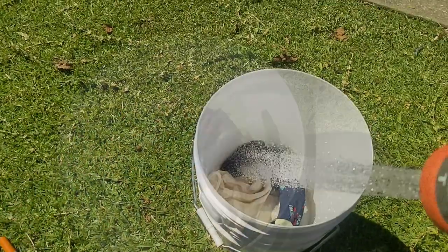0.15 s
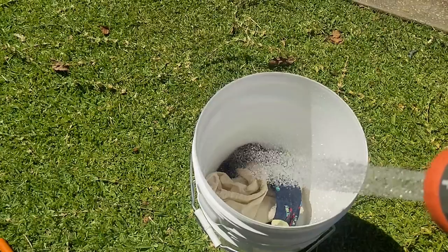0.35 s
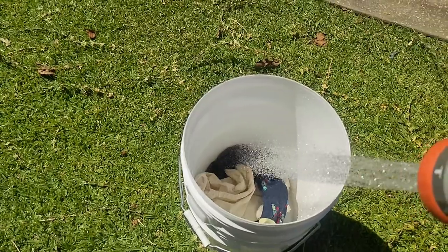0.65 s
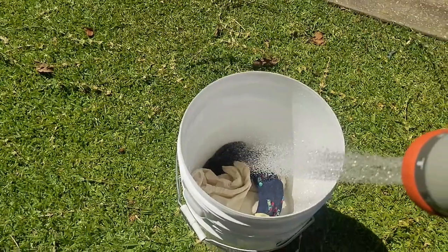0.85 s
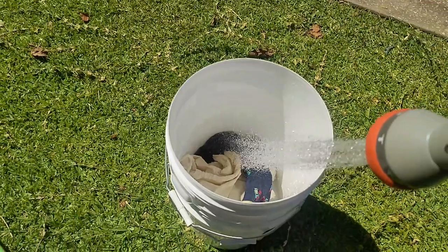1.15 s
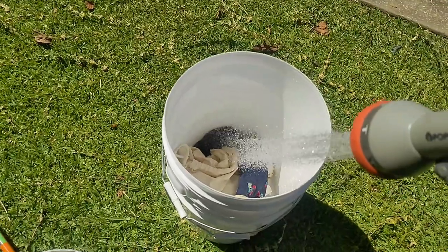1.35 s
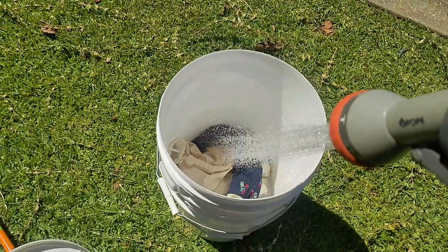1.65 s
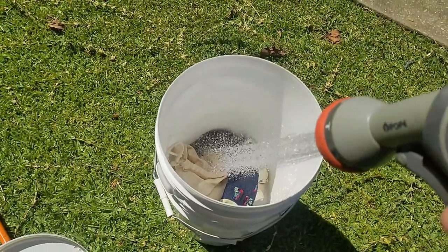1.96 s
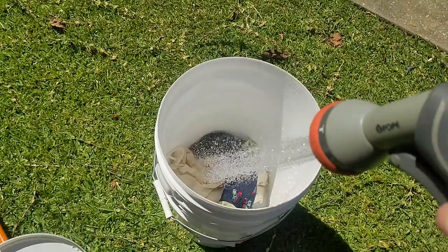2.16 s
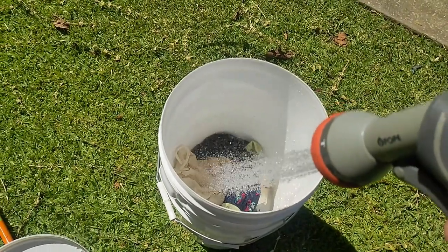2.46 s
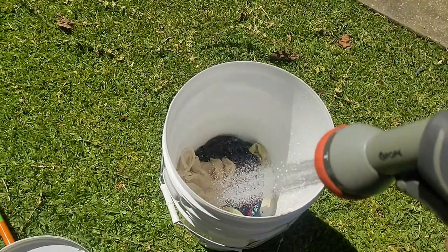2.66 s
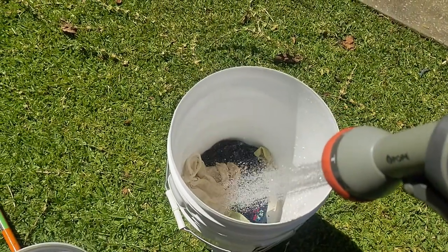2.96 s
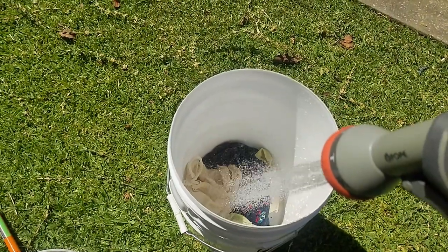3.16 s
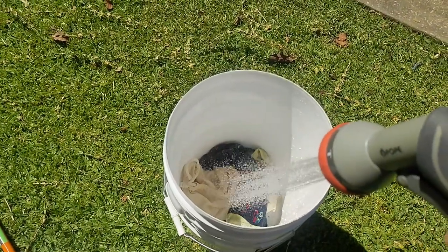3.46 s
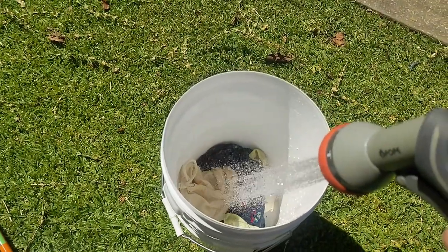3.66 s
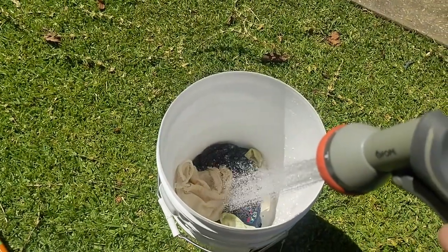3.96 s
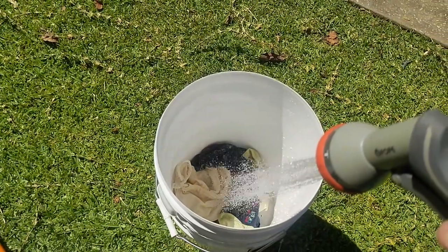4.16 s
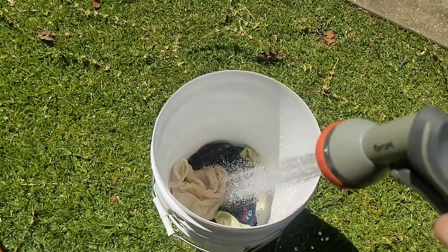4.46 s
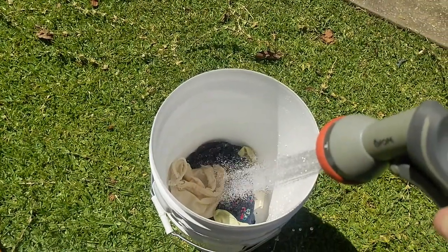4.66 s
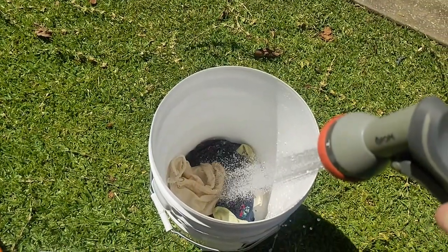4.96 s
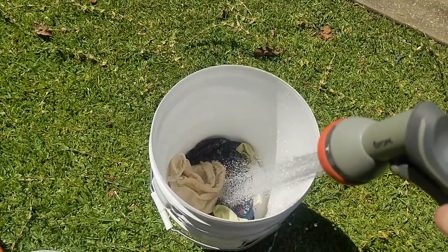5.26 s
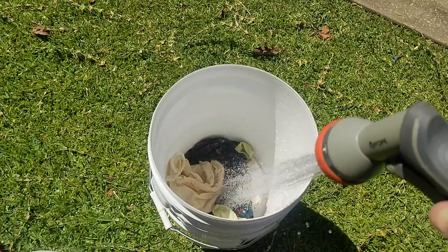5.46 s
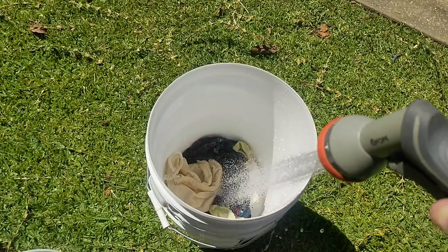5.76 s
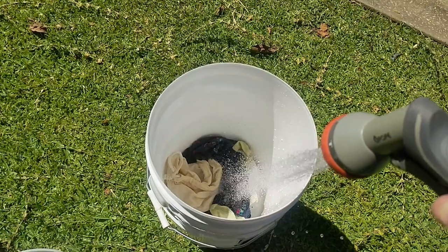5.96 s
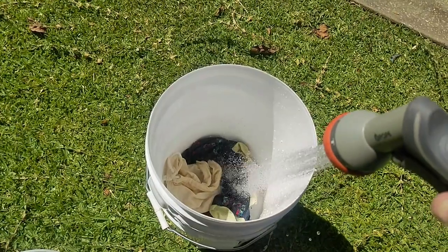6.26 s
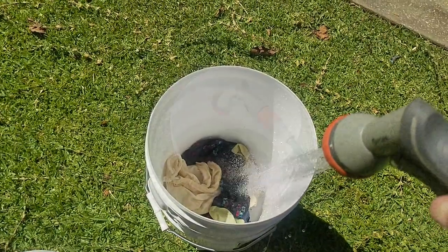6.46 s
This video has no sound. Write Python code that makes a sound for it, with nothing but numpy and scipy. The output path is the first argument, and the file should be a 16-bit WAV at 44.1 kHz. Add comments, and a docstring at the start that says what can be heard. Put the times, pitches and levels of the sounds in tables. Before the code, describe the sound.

Outdoors, close to the microphones and slightly right, a hose jet is already spraying into a plastic bucket holding wet laundry. From 0 to 0.6 s it is thin and grainy, with separate bright ticks on plastic and low wind buffets. It strengthens from 0.7 s to a dense, high, sizzling hiss around 1.3 to 1.9 s, with crackles, sharp wall ticks, dull slaps on cloth and a quick gurgle near 1.6 s. It thins noticeably around 2.3 s, then builds again by 3 s, with hollow rings that wobble and glide between 2.8 and 4 s and small gurgles near 3, 3.9 and 5 s. From 4 s the spray is full and steady, splashing into a gathering pool with more bubbles and muffled drumming beneath. A patter flurry comes near 6.2 s. Faint breeze and yard air persist; the water is still running at 6.6 s.

```python
"""Hose spray into a bucket of laundry

A garden hose nozzle sprays into a plastic bucket of laundry on a lawn, just right of the microphones.
Thousands of random clicks stand for drops: filters make them hiss on plastic, splash on wet cloth
and drum on the air in the bucket. Short tones make slaps, bubbles and patters; drifting tones make hollows ring.
The jet swings from the wall over the cloth into the gathering pool, which changes the colour.
Slow-changing low noise is the light breeze on the microphones, over a quiet, steady yard background.
"""
import sys
import numpy as np
from scipy import signal
from scipy.fft import rfft, irfft
from scipy.io import wavfile
from scipy.ndimage import uniform_filter1d, map_coordinates

SR = 44100
rng = np.random.default_rng(int(sys.argv[2]) if len(sys.argv) > 2 else 0)


def persist_wave(psi):
    """Save psi, clipped to +-1, as 16-bit WAV."""
    counts = np.round(np.clip(psi, -1, 1) * 32767).astype(np.int16)
    wavfile.write(sys.argv[1], SR, np.atleast_2d(counts).T)


N = 291942
TAPS = 2048  # length of filters and of short sounds, in samples
TIME = np.arange(N) / SR
FREQS = np.maximum(np.arange(TAPS // 2 + 1), .5) * SR / TAPS  # the lowest is kept above zero for logarithms

# how loud the jet is where it lands, before gains and flutter: (t/s, hiss level/dB, splash level/dB, drum level/dB)
JET_LEVELS = [(0.0, -28, -42.5, -44.5), (0.25, -30.5, -46, -43.5), (0.47, -28, -41, -40.5),
              (0.64, -27.7, -38.5, -37), (0.73, -23.3, -36.8, -36), (0.95, -22.5, -33.5, -34),
              (1.25, -19.5, -31.5, -35.4), (1.53, -20.5, -31.5, -36), (1.86, -21, -34, -35),
              (2.1, -24.5, -36, -39), (2.3, -28.2, -37.5, -40), (2.6, -24.5, -34, -37.5),
              (2.9, -23.5, -32.5, -38), (3.55, -22, -33, -36), (3.95, -22, -32, -36.5),
              (4.25, -21, -31.5, -37.5), (4.85, -20.5, -32.5, -36.5), (5.85, -20, -31.5, -38.5),
              (6.05, -20, -32, -39), (6.35, -19.5, -30, -35), (6.62, -21.0, -32, -34)]
# where the hand points the jet, before trembling:
# (t/s, place: 0 far wall, 1 foot of the wall, 2 cloth, 3 pool, 4 and above near wall)
JET_AIM = [(0, 1.5), (1.05, 0), (1.35, 1.34), (1.65, 1), (2.0, 1.8), (2.45, 1.14), (3.6, 2), (4.3, 2.5),
           (5.1, 3.5), (5.95, 2.5), (6.4, 9)]
# how the jet breaks up on each place, one row per place:
# (spread of drop sizes/dB, extra coarse hiss level/dB, crackle level/dB before its gain)
JET_BREAKUP = [(3.5, 3.5, -1), (3, 1, -1.5), (2.5, 0.6, -4.5), (3.0, -1.3, -12.5), (3, 0.8, -11.5)]
# brief surges of the spray, full in the hiss and about half as many dB in splash and drum: (t/s, rise level/dB)
JET_SURGES = [(.44, 2.5), (4.8, 2)]
SURGE_S = 0.1  # length of a surge
HISS_DB, SPLASH_DB, DRUM_DB = 0.59, 1.84, -0.54  # gain of each layer
# below full hiss the spray thins to lone drops: dB more spread per dB of level
THIN_SPRAY, FULL_HISS_DB = 0.082, -18.5

# spray on plastic: (f/Hz, coarse drops level/dB, fine drops level/dB)
PLASTIC_HISS = [(2510, -42.5, -47), (5460, -24, -43.5), (5780, -12.5, -37), (5870, -13, -37),
                (6260, -8.5, -16), (7000, -5.5, -11.5), (7720, -5, -4), (7970, -9, -1), (8956, -17, -0.5),
                (8720, -6.5, -2.5), (9360, -27, -9), (9440, -36.5, -20.5), (10700, -38, -18.5)]
# a thin high ring of sparser drops: (f/Hz, level/dB)
THIN_RING = [(6500, -35.5), (7900, -13), (8300, -6.5), (8520, 0), (8750, -10), (9100, -18), (9700, -29)]
# higher resonances, rung by the splashing: (f/Hz, width f/Hz, relative level/dB on each of the five places)
SPLASH_RESONANCES = [(1463, 87, -8, -17, -4, -8.5, -12), (1588, 100, -8, -8, -0.5, -8.3, -7),
                     (1727, 150, -8, -3, 0, -3.5, -1), (1952, 204, -9, -3, -4, 0, -4.5),
                     (2160, 200, -12.5, -7.5, -5.5, -11, -2), (2520, 290, -9, -7, -5.5, -12, -5),
                     (2816, 300, -5, -9, -5.5, -6.5, -4), (3370, 320, 1.5, 1, 0, -0.5, 3),
                     (3625, 510, -6, -1.5, 0, -1.5, 3), (3920, 550, -2, -3.5, -14, -4.5, 0),
                     (4660, 1140, -15, -12, -10.5, -7.5, -10)]
# air resonances of the bucket: (f/Hz, width f/Hz, relative level/dB on each of the five places)
AIR_RESONANCES = [(284.3, 63, -9, -5.5, -3.5, -7.5, -3.5), (397.6, 86, -8.5, 1, -5, -5.5, -2),
                  (494, 97, -7.5, -5, -16.5, -11, -13), (615, 243, -12, -3.5, -4, -3.5, -1),
                  (753, 81, 0, 0, -12, -13, -4.5), (831, 70, -15, 0.5, -2, -2, -0.5),
                  (924, 51, -1, -1, -5.5, -7.5, -2), (1048, 106, -4, -4, -1.5, -8, -2),
                  (1149, 70, -4.5, -22.5, -6, -4.5, -5.5), (1289, 130, -8.5, -10, -3, -12, -5.5)]
WAVER_SHARE = .006  # the sloshing water shifts the resonances

# a coarse drop cracking on bare plastic, also the colour of slap spatter: (f/Hz, level/dB)
CRACK_COLOUR = [(700, -21.5), (1500, -2.5), (2000, -1), (2600, -4), (3400, -6), (4100, -4.5), (5200, -11),
                (7000, -24), (9500, -31)]
CRACKLE_DB, CRACKLE_FOLLOWS = -17.5, 0.63  # gain; share of the splash level that it follows

# gusts on the microphones, each a swell before flicker: (t/s, length t/s, left level/dB, right level/dB)
WIND_GUSTS = [(0, 0.15, -41, -46), (0.22, 0.19, -51, -48), (0.51, 0.18, -42, -37),
              (0.727, 0.07, -58, -40.5), (0.867, 0.12, -51, -39.5), (1.13, 0.18, -62, -43),
              (1.68, 0.27, -49, -55), (1.98, .3, -56, -59), (2.184, 0.16, -49, -62),
              (3.05, .07, -49.5, -55), (3.34, .08, -57, -51), (4.078, 0.082, -51, -59),
              (4.28, 0.12, -50, -66), (4.436, 0.27, -60, -43), (4.757, 0.11, -58, -41),
              (5.36, .12, -51, -67), (5.664, 0.13, -42, -71), (5.86, 0.21, -55, -51),
              (6.023, .16, -50, -58), (6.177, 0.11, -59, -40.5), (6.294, .08, -58, -41)]
# wind rumble: (f/Hz, level/dB)
WIND_RUMBLE = [(12, -23.5), (32, 2), (50, 0.5), (78, 3), (110, -4.5), (170, -15.5), (300, -31), (1000, -60)]
BREEZE_DB = -61  # the light air between gusts, before it wanders
# steady outdoor background: (f/Hz, level/dB before its gain)
YARD_COLOUR = [(30, 3), (75, -5.5), (150, 4), (250, -17), (600, -8.5), (3000, -15.5), (9000, -28)]
YARD_DB = -57.5

# hollows in the laundry that ring as the jet passes, before slosh and patchiness:
# (t/s, length t/s, f/Hz, glide in Hz per s, level/dB)
HOLLOWS = [(0.05, .25, 755, 0, -48.5), (.55, .3, 760, -1.5, -49), (0.93, 0.4, 792, 60, -43.5),
           (1.4, .7, 830, 60, -46), (1.6, .8, 409.5, -40, -49), (2.57, .16, 970, 1, -44.5),
           (2.84, 0.24, 1010, 346, -40.5), (2.92, 0.48, 1597, 281.5, -41), (3.22, .14, 1550, -300, -44),
           (3.27, .26, 1000, 250, -44), (3.299, .75, 1295, 30, -45.5), (3.53, 0.56, 825, 20, -42),
           (3.66, .2, 1740, 700, -48), (4.05, 0.45, 1620, 0, -45), (4.85, 1.2, 836, -10.5, -46.5)]
POCKET_WIDTH = 0.05  # bandwidth as a share of the pitch
POCKET_SLOSH_SHARE, POCKET_PATCHY_DB = .016, 1.6  # spread of each hollow's pitch and of its level

# big drops that tick on the wall: (first touch t/s, level/dB before the shared gain)
WALL_TICKS = [(.0139, -19), (0.1827, -16), (0.199, -14.5), (0.2364, -15.5), (0.2853, -14), (0.4364, -13.5),
              (.6586, -16.5), (0.6913, -11), (0.7223, -12), (0.7402, -16), (0.9113, -14), (0.9732, -10),
              (0.9852, -5.5), (1.0666, -12), (1.1414, -12), (1.1634, -9.5), (1.3453, -9), (1.5584, -10.5),
              (1.5718, -9), (1.8377, -12), (1.8696, -12.5), (1.8966, -9.5), (2.0986, -9), (2.5621, -13.5),
              (2.9931, -12), (3.1667, -13), (3.2036, -12), (4.1265, -14), (4.4139, -13), (4.774, -10.5),
              (6.5845, -13)]
# a heavy drop on plastic: (f/Hz, level/dB)
HEAVY_DROP_RING = [(3000, -42), (5400, -27), (6400, -14), (7200, 1.5), (8400, 4.5), (9000, -6.5),
                   (9700, -33.5)]
TICK_DB, TICK_RISE_S = 15.2, .0011  # shared gain; delay from first touch to burst
# big drops that slap wet cloth: (t/s, level/dB before the shared gain, f/Hz, ring time t/s)
CLOTH_SLAPS = [(.6031, -20.5, 1550, 0.00034), (.864, -23, 3360, 0.00033), (.9454, -17.5, 3320, 0.0003),
               (1.0962, -24, 3970, .0003), (1.1424, -9, 2530, 0.00018), (1.202, -21, 3560, 0.0006),
               (1.2437, -9, 3370, 0.00021), (1.3068, -19, 3420, .0003), (1.3392, -19, 3490, .0003),
               (1.556, -21, 3600, .0003), (1.679, -22.5, 1800, .0008), (1.6816, -11.5, 3800, 0.00022),
               (1.7298, -23, 3470, .0003), (1.747, -13, 3550, 0.00035), (1.819, -19, 3920, .0003),
               (1.8746, -14.5, 3800, 0.00029)]
SLAP_DB = 11  # shared gain of the slaps
SPATTER_DB, SPATTER_S = -16, 0.003  # droplets thrown off by a slap: level against the slap, fall time
# flurries of drops on one patch of wet wall: (t/s, length t/s, middle f/Hz, level/dB)
WALL_PATTERS = [(0.879, .12, 3400, -39), (1.05, .14, 3700, -38), (1.2, .2, 3150, -35),
                (1.37, .26, 3720, -34.5), (1.2, 0.22, 6830, -27.5), (1.79, 0.19, 3700, -35),
                (6.19, .24, 4100, -38.5)]
# gurgles in folds of the cloth, each a quick run of bubbles:
# (t/s, average gap between bubbles t/s, middle f/Hz, starting level/dB)
FOLD_GURGLES = [(1.586, .0065, 1840, -18), (3.021, .007, 1630, -28), (3.941, .011, 1614, -19),
                (5.035, .01, 1910, -20)]
GURGLE_RING_S, GURGLE_FADE_DB_PER_S = 0.0035, 42  # ring time of a bubble; how the run fades

# the left microphone faces away from the bucket: (f/Hz, level/dB against the right one)
LEFT_SHADOW = [(250, -2), (450, -5), (700, -8.5), (850, -7), (1050, -4.5), (1400, -2.5), (1950, -5.5),
               (2400, 0), (3000, -4), (3450, -8.5), (4500, -0.5), (5300, -2), (6400, -11), (7400, -11),
               (8700, -17)]
LEFT_LAG_S = 0.00023  # short sounds reach the left this much later
TOP_HZ = 9650  # where the recorder cuts the top


def undb(db):
    """Decibels to gain."""
    return np.exp(np.asarray(db) * (np.log(10) / 20))


def curves(table):
    """Each column of a table of (s, values..) at every sample."""
    s, *columns = np.transpose(table)
    return [np.interp(TIME, s, column) for column in columns]


def unit(x):
    """Scale so that the last (right) channel has an rms, or average strength, of 1."""
    return x / np.sqrt(np.mean(x[-1] ** 2))


def walk(rate, time=TIME):
    """Wander by chance: straight lines between random values, rate of them a second; spread near 1."""
    steps = rng.standard_normal(N // 64)
    return 1.167 * np.interp(time * rate, np.arange(len(steps)), steps)


def swell(s, length_s, time=TIME):
    """A smooth rise and fall around a moment, peak 1."""
    out = np.zeros(len(time))
    near = abs(time - s) < 2 * length_s
    out[near] = np.exp(-(2 * (time[near] - s) / length_s) ** 2)
    return out


def shape(points):
    """Gain at each frequency from (Hz, dB) points."""
    hz, db = np.transpose(points)
    return undb(np.interp(np.log(FREQS), np.log(hz), db))


def colour(x, gain):
    """Filter with the given gain at each frequency, without sounding ahead of its input."""
    cepstrum = irfft(np.log(gain + 1e-6))
    # folding the second half onto the first puts the response as early as possible
    cepstrum[1:TAPS // 2] *= 2
    cepstrum[TAPS // 2 + 1:] = 0
    response = irfft(np.exp(rfft(cepstrum)))
    return signal.oaconvolve(x, response[None])[:, :N]


def resonance(hz, width):
    """Gain of steep resonances at each frequency, one column each."""
    f = FREQS[:, None]
    detuning = (f ** 2 - hz ** 2) / (f * width)
    return 1 / (1 + (np.sqrt(2) - 1) * detuning ** 2)


def impulses(s, size):
    """Clicks at the given times, each shared between two samples."""
    at = np.clip(s * SR, 0, N)
    i = at.astype(int)
    first = np.bincount(i, size * (1 + i - at), N + 2)
    second = np.bincount(i + 1, size * (at - i), N + 2)
    return (first + second)[:N]


def shower(spread_db, echo, lag_s, lag_spread_s, count):
    """Drops of very unequal size; each lands elsewhere, so it has its own lag to the left and its own wall echo."""
    s, rank, path, sign = rng.random((count, 4)).T
    s = s * N / SR
    weight = np.minimum(-np.log(1 - rank), 6.5)  # drops above a certain size break up
    size = np.sign(sign - .5) * undb(np.interp(s, TIME, spread_db) * weight)
    lag = lag_s + lag_spread_s * rng.laplace(size=count)
    back = s + 0.000303 + .002 * path  # when the echo returns
    return np.array([impulses(s + d, size) + echo * impulses(back + d, size) for d in (lag, 0)])


def steady(x):
    """Hold the flow of a shower even over a third of a second, whatever its drop sizes."""
    return x / np.sqrt(uniform_filter1d(x[-1] ** 2, SR // 3))


def bucket(x, modes, aim):
    """Ring the resonances; how strongly each is driven depends on where the jet lands."""
    hz, width, *places = np.transpose(modes)
    power = resonance(hz, width) ** 2
    aim = np.clip(aim, 0, len(places) - 1)
    out = 0
    for place, db in enumerate(places):
        nearness = np.maximum(1 - abs(aim - place), 0)  # fade between neighbouring places
        out += nearness * unit(colour(x, np.sqrt(power @ undb(db) ** 2)))
    return out


def add(track, s, sound):
    """Mix a short sound into both channels; it reaches the left one later."""
    for channel, at in zip(track, (s + LEFT_LAG_S, s)):
        i = min(max(int(at * SR), 0), N)
        channel[i:i + len(sound)] += sound[:N - i]


def blip(hz, ring_s):
    """A tone that swells and dies within a few ring times."""
    t = TIME[:TAPS]
    return t / ring_s * np.exp(-t / ring_s) * np.sin(2 * np.pi * hz * t)


def bubbles(low_hz, high_hz, cycles, rise, size_db, count):
    """Trapped air rings briefly and rises in pitch; there is more of it as the pool gathers."""
    out, t = np.zeros((2, N)), TIME[:TAPS]
    for when, pitch, rank in rng.random((count, 3)):
        hz = low_hz * (high_hz / low_hz) ** pitch
        age = t * hz / cycles  # in fall times
        ring = np.sin(2 * np.pi * hz * t * (1 + rise * np.minimum(age, 4))) * np.exp(-age)
        size = undb(size_db * min(-np.log(1 - rank), 4))
        add(out, when ** .7 * N / SR, ring * size)  # the power crowds bubbles towards the end
    return unit(out)


def waver(x):
    """Let all pitches drift a little together, by reading the sound slightly faster or slower."""
    at = np.cumsum(1 + WAVER_SHARE * walk(5))
    return np.array([map_coordinates(channel, [at], order=2, mode="mirror") for channel in x])


def hissing(spread_db, coarse_db):
    """Spray ticks on the plastic in clumps as the jet breaks up; coarse drops sound lower, sparser ones ring thinly."""
    hz, *spectra = np.transpose(PLASTIC_HISS)
    hiss = 0
    for db, share in zip(spectra, (undb(coarse_db), 1)):
        drops = steady(shower(spread_db, echo=0.32, lag_s=.00016, lag_spread_s=.00005, count=50000))
        clumps = undb(1.58 * walk(450) + 0.2 * walk(70))
        hiss += share * colour(drops * clumps, shape(np.c_[hz, db]))
    sparse = steady(shower(spread_db, echo=0.36, lag_s=.00016, lag_spread_s=.00005, count=6000))
    thin_ring = unit(colour(sparse, shape(THIN_RING)))
    return unit(unit(hiss) + undb(-8.5) * thin_ring)


def splashing(aim, spread_db):
    """Drops burst on the wet cloth and in the pool and whip bubbles into it."""
    drops = steady(shower(spread_db - .7, echo=0.49, lag_s=.00014, lag_spread_s=.000045, count=45000))
    fizz = bubbles(low_hz=900, high_hz=4150, cycles=11, rise=0.023, size_db=3.5, count=900)
    return bucket(drops, SPLASH_RESONANCES, aim) * undb(0.66 * walk(60)) + undb(-15.5) * fizz


def drumming(aim):
    """The dense patter on the laundry drives the air in the bucket; large bubbles gurgle under it."""
    patter = shower(np.full(N, 2.0), echo=0.29, lag_s=.00008, lag_spread_s=.00007, count=30000)
    gurgle = bubbles(low_hz=451.0, high_hz=1260, cycles=11.8, rise=0.014, size_db=-3.0, count=600)
    return bucket(patter, AIR_RESONANCES, aim) * undb(0.49 * walk(17)) + undb(-20.5) * gurgle


def crackling():
    """Sparse coarse drops crack on the bare plastic."""
    drops = steady(shower(np.full(N, 2.5), echo=0.32, lag_s=0.00012, lag_spread_s=.00005, count=2000))
    return unit(colour(drops, shape(CRACK_COLOUR)))


def outdoors():
    """Gusts buffet each microphone separately, over a light breeze and a quiet background common to both."""
    power = undb(BREEZE_DB + 2.6 * np.array([walk(2.9), walk(5.7)])) ** 2
    for s, length_s, left_db, right_db in WIND_GUSTS:
        power += undb([[left_db], [right_db]]) ** 2 * swell(s, length_s) ** 2
    rumble = unit(colour(rng.standard_normal((2, N)), shape(WIND_RUMBLE)))
    wind = rumble * np.sqrt(power) * undb(1.3 * walk(24))
    yard = unit(colour(rng.standard_normal((1, N)), shape(YARD_COLOUR)))
    return wind + undb(YARD_DB) * yard


def pockets():
    """Hollows in the laundry ring narrowly and in patches as the jet passes; filling and draining moves their pitch."""
    out = np.zeros((2, N))
    for s, length_s, hz, glide, db in HOLLOWS:
        t = TIME[abs(TIME - s) < length_s]
        slosh, patch = walk(11, t), walk(14, t)
        # two wandering strengths spread the tone into a narrow band
        a, b = walk(POCKET_WIDTH * hz, t), walk(POCKET_WIDTH * hz, t)
        pitch = hz * (1 + POCKET_SLOSH_SHARE * slosh) + glide * (t - s)
        phase = 2 * np.pi * np.cumsum(pitch) / SR
        level = undb(db + POCKET_PATCHY_DB * np.minimum(patch, 1))
        ring = (a * np.cos(phase) + b * np.sin(phase)) * level
        add(out, t[0], ring * swell(s, length_s, t))
    return out


def wall_ticks():
    """Single heavy drops burst on the plastic: a bright tick trailed by its spatter."""
    ticks, t = np.zeros((2, N)), TIME[:TAPS]
    ring = shape(HEAVY_DROP_RING)
    for s, db in WALL_TICKS:
        burst = rng.standard_normal(TAPS) * (np.exp(-t / .00014) + undb(-26) * np.exp(-t / .003))
        strength = np.sqrt(np.mean(abs(rfft(burst) * ring) ** 2))  # how hard this spatter rings the plastic
        add(ticks, s + TICK_RISE_S, burst / strength * undb(db + TICK_DB))
    return colour(ticks, ring)


def cloth_slaps():
    """Single heavy drops slap wet cloth: a dull short tone, trailed by noisy spatter."""
    slaps, spatter, t = np.zeros((2, N)), np.zeros((2, N)), TIME[:TAPS]
    for s, db, hz, ring_s in CLOTH_SLAPS:
        add(slaps, s, undb(db + SLAP_DB) * blip(hz, ring_s))
        droplets = rng.standard_normal(TAPS) * np.exp(-t / SPATTER_S)
        add(spatter, s, undb(db + SLAP_DB + SPATTER_DB) * droplets)
    return slaps + colour(spatter, shape(CRACK_COLOUR))


def patters(count):
    """Flurries of drops on one patch of wet wall, each a short blip near the patch's pitch."""
    out = np.zeros((2, N))
    for s, length_s, hz, db in WALL_PATTERS:
        flurry = np.zeros((2, N))
        for when, pitch, size in rng.standard_normal((count, 3)):
            drop = undb(2.8 * min(size, 1.2)) * blip(hz * np.exp(.07 * pitch), 0.0004)
            add(flurry, s + when * length_s / np.sqrt(8), drop)
        strength = np.sqrt(np.sum(flurry[1] ** 2) / (length_s * SR))
        out += flurry * undb(db) / strength
    return out


def fold_gurgle(count):
    """Air escapes from folds of cloth as runs of bubbles of nearly one size, fading along each run."""
    out = np.zeros((2, N))
    for s, gap_s, hz, db in FOLD_GURGLES:
        for k, (late, size) in enumerate(rng.uniform(-1, 1, (count, 2))):
            age_s = (k + 0.303 * late) * gap_s
            bubble = blip(hz * (1 + 0.063 * size), GURGLE_RING_S)
            add(out, s + age_s, undb(db - GURGLE_FADE_DB_PER_S * age_s) * bubble)
    return out


def scene():
    """The water sounds together, shadowed on the left, in the open air."""
    hiss_db, splash_db, drum_db = curves(JET_LEVELS)
    aim = curves(JET_AIM)[0] + 0.079 * walk(7.1)  # the hand trembles, so the colour wanders
    places = np.arange(len(JET_BREAKUP))
    spread_db, coarse_db, crackle_db = (np.interp(aim, places, column) for column in np.transpose(JET_BREAKUP))
    # the jet flutters and surges as a whole
    flow_db = 0.2 * walk(40) + sum(db * swell(s, SURGE_S) for s, db in JET_SURGES)
    hiss_spread_db = spread_db + THIN_SPRAY * np.maximum(FULL_HISS_DB - hiss_db, 0)

    water = undb(hiss_db + HISS_DB + flow_db) * hissing(hiss_spread_db, coarse_db)
    water += undb(splash_db + SPLASH_DB + 0.45 * flow_db) * splashing(aim, spread_db)
    drum = undb(drum_db + DRUM_DB + 0.47 * flow_db) * drumming(aim)
    water += undb(CRACKLE_DB + crackle_db + CRACKLE_FOLLOWS * splash_db) * crackling()
    water += waver(drum + pockets())
    water += wall_ticks() + patters(count=120)
    water += (cloth_slaps() + fold_gurgle(count=6)) * undb([[-7], [0]])  # weaker on the left
    left = colour(water[:1], shape(LEFT_SHADOW))
    return np.vstack([left, water[1:]]) + outdoors()


def record(dry):
    """The recorder rounds the sharpest peaks and cuts the top steeply."""
    rounded = dry / (1 + (dry / .82) ** 8) ** (1 / 8)
    top_cut = signal.ellip(14, .2, 80, TOP_HZ, fs=SR, output="sos")
    return signal.sosfilt(top_cut, rounded)


dry = scene()
out = record(dry)
persist_wave(out)
```